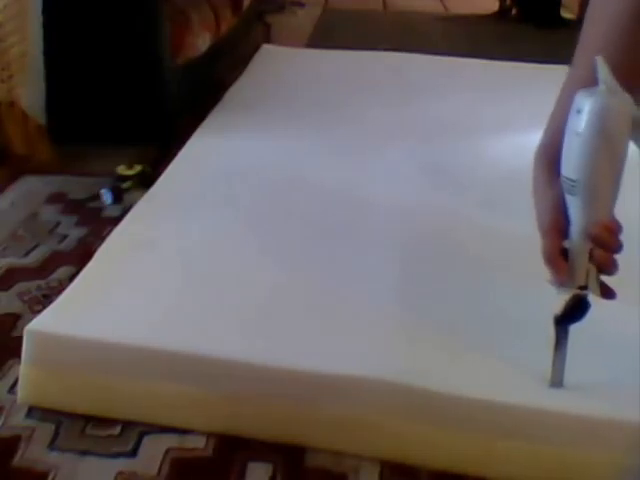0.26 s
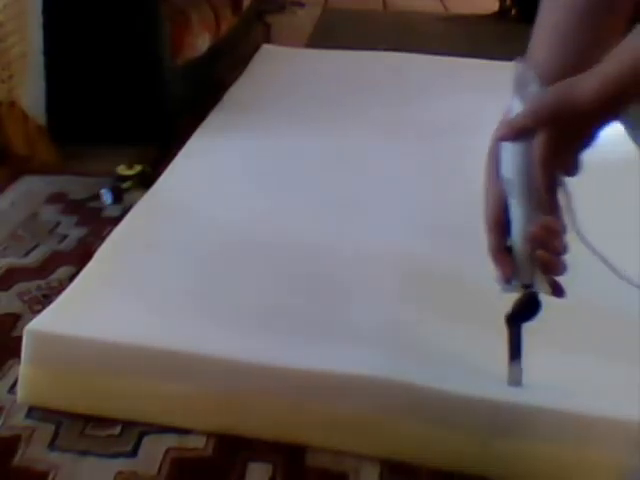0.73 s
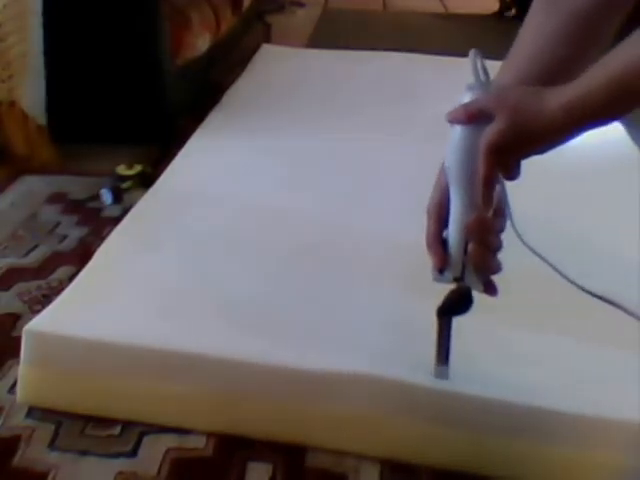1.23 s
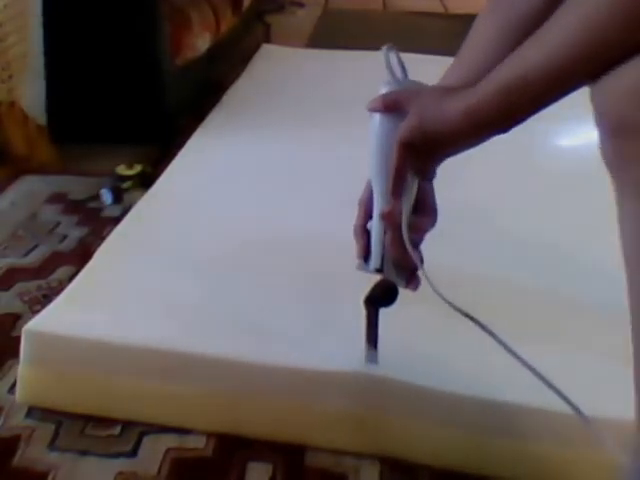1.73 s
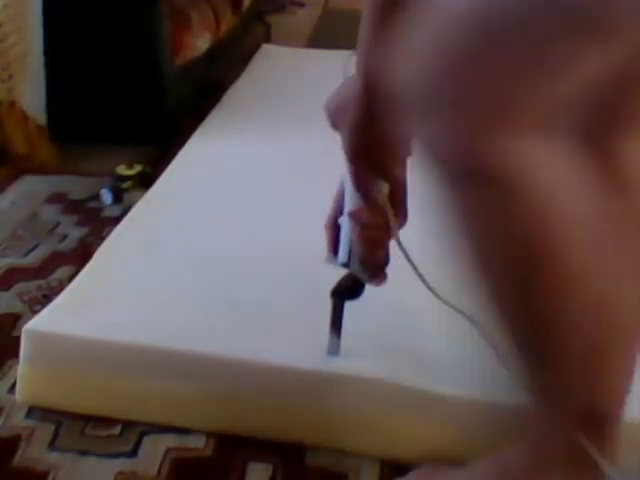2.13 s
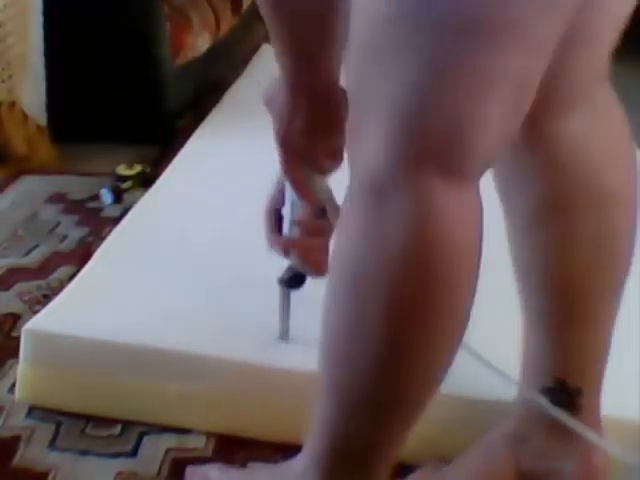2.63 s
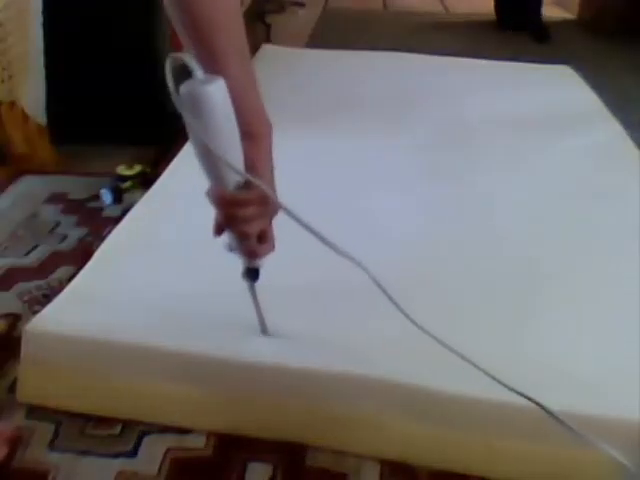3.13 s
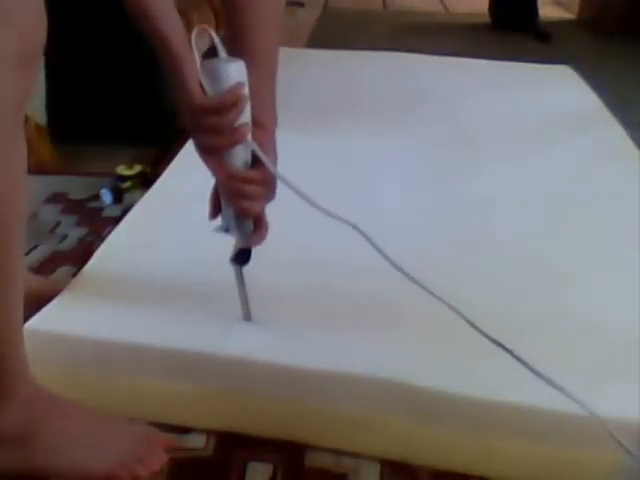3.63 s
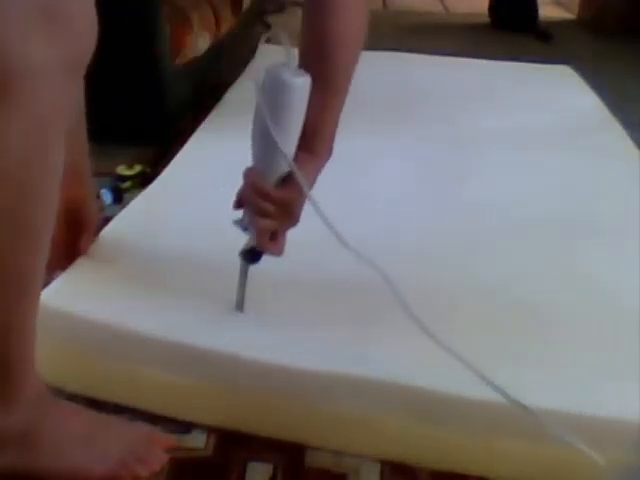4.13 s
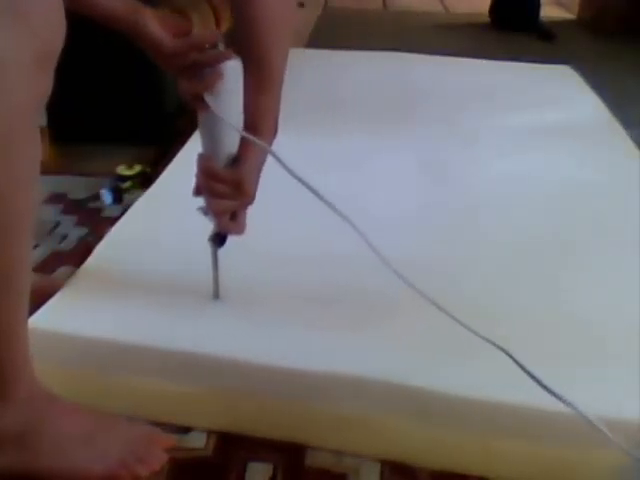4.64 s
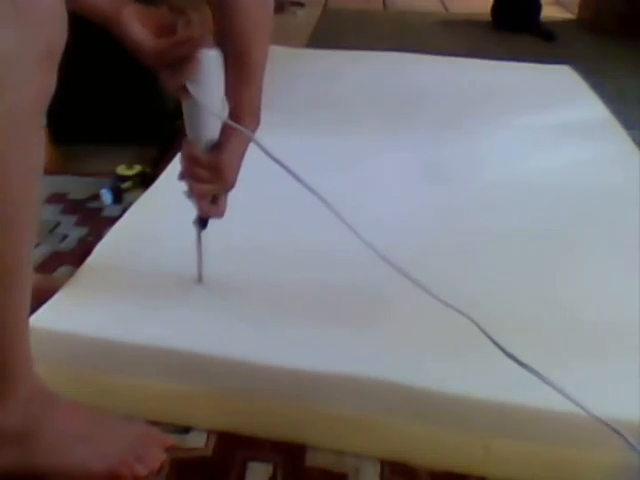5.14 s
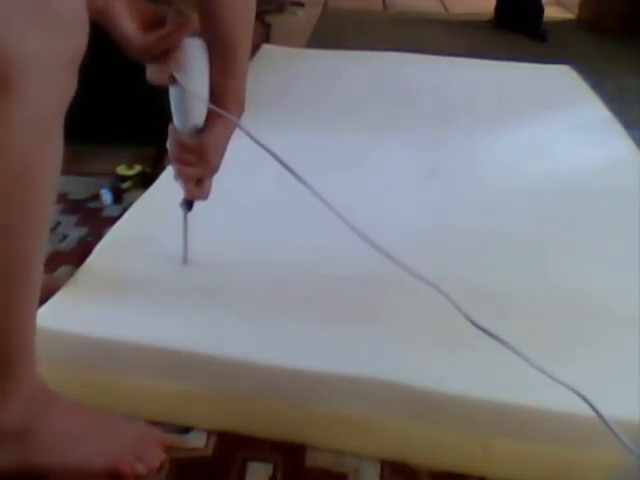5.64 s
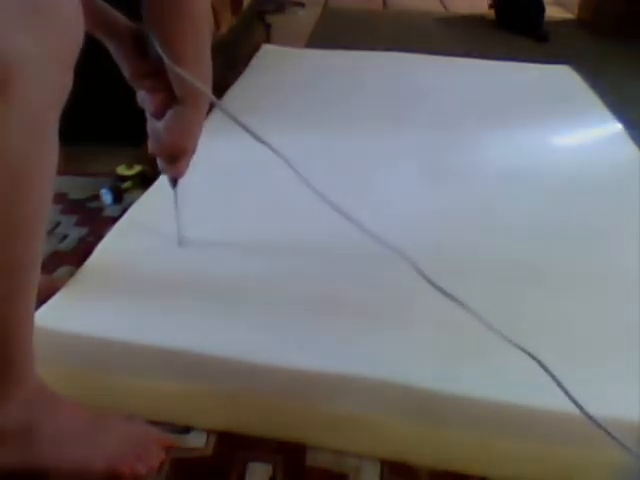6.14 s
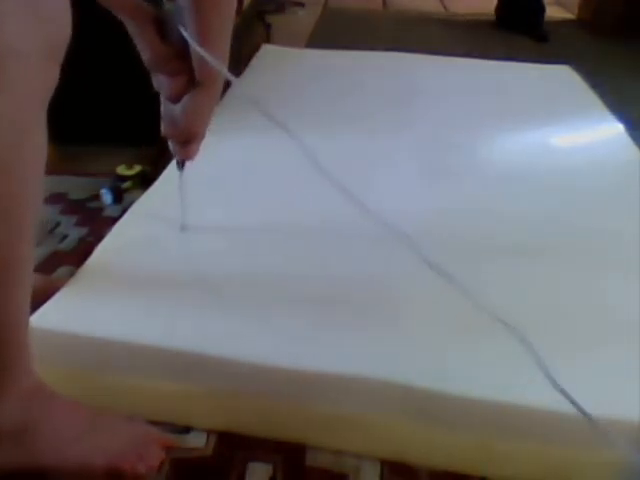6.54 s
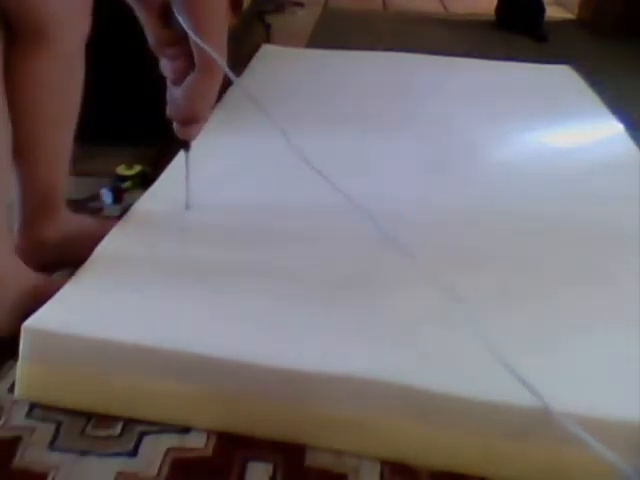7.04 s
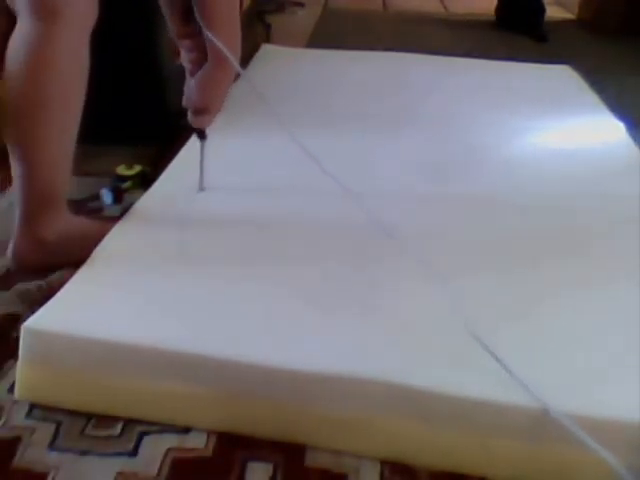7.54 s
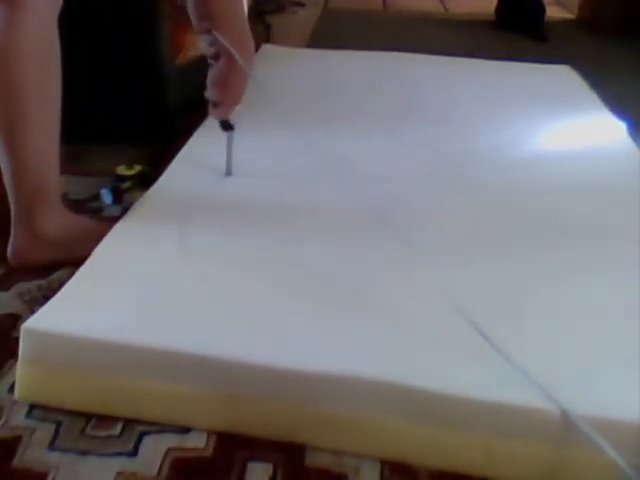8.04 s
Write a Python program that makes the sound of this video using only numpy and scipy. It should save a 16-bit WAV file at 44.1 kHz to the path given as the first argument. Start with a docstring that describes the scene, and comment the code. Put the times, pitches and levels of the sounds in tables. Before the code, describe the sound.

An electric carving knife cuts a foam mattress in a carpeted room, close to a stereo microphone. The motor stutters at first, then holds a high, wavering whine with a fizzing hiss, a blade rasp and a few thin squeals. The pitch sags, the sound drops out briefly and returns faster. Near the end it runs lighter and quieter with a slight rattle. A faint hum lies underneath.

```python
"""An electric carving knife saws a foam mattress in a carpeted room, close to a stereo microphone pair.
Over a steady hum, the brush motor stutters into the cut as the trigger slips. It whines on multiples of
the rotor speed, the brushes fizz twice a turn and the serrated blades rasp, with a few brief squeals.
The pitch sags as the blades bind; near 2.7 s the whole sound dips briefly, then the knife runs faster.
From about 6 s it runs light and quieter: the slack gear rattles and the mattress thrums for a moment."""
import sys
import numpy as np
from scipy import signal
from scipy.fft import rfft, irfft, next_fast_len
from scipy.io import wavfile
from scipy.ndimage import uniform_filter1d

SR = 44100
rng = np.random.default_rng(int(sys.argv[2]) if len(sys.argv) > 2 else 0)


def persist_wave(psi):
    """Save psi, clipped to +-1, as 16-bit WAV."""
    counts = np.round(np.clip(psi, -1, 1) * 32767).astype(np.int16)
    wavfile.write(sys.argv[1], SR, np.atleast_2d(counts).T)


N = 365148
TIME = np.arange(N) / SR


def undb(db):
    """Decibels to gain."""
    return 10 ** (np.asarray(db) / 20)


def unit(x):
    """Scale to rms 1."""
    return x / np.sqrt(np.mean(x ** 2))


def curves(rows):
    """Each column of a time table, joined by straight lines."""
    times, *columns = np.transpose(rows)
    return [np.interp(TIME, times, column) for column in columns]


def colour(x, points):
    """Filter by a spectrum of (Hz, dB) points."""
    hz, db = np.transpose(points)
    size = next_fast_len(N)
    bins = np.maximum(np.fft.rfftfreq(size, 1 / SR), 1)
    gain = undb(np.interp(np.log(bins), np.log(hz), db))
    return irfft(rfft(x, size) * gain, size)[:N]


def walk(rate):
    """Smooth random wander of rms 1, with rate changes a second."""
    step = max(int(SR / rate), 1)
    held = np.repeat(rng.standard_normal(N // step + 1), step)
    return unit(uniform_filter1d(uniform_filter1d(held, step), step)[:N])


def grains(spread_db):
    """Dense tiny clicks of scattered size."""
    return unit(rng.standard_normal(N) * undb(spread_db * rng.standard_normal(N)))


def ring(hz, width_hz):
    """A randomly driven resonance of rms 1; its centre may move."""
    pole = np.exp(-np.pi * width_hz / SR)
    drive = rng.standard_normal(N) + 1j * rng.standard_normal(N)
    envelope = signal.lfilter([1], [1, -2 * pole, pole ** 2], drive)
    carrier = np.exp(2j * np.pi * np.cumsum(hz * np.ones(N)) / SR)
    return unit(np.real(envelope * carrier))


# The hum behind the knife. Each row: time in seconds, level in dB.
HUM_LEVEL = [(0, -59), (.6, -55.5), (2.5, -54), (3.1, -57.5), (6.5, -57), (7.3, -59.5), (8.28, -57.5)]
def hum(swing_db, hz=480.4, follow=0.37):
    """A clean tone of fixed pitch; its level wavers and swells a little with the knife's."""
    db = curves(HUM_LEVEL)[0] + follow * swing_db + .8 * walk(14)
    return np.sqrt(2) * undb(db) * np.sin(2 * np.pi * hz * TIME)


# The room at the microphones. Each row: frequency in Hz, side against mid in dB.
ROOM_WIDTH = [(30, -13.5), (250, -12), (1000, -11.5), (2500, -15.5), (5000, -17.5), (9000, -15),
              (15000, -15.5)]
def room(x, t60=.5):
    """Diffuse reflections scramble the phase: the part that differs between left and right."""
    t = TIME[:16384]
    response = rfft(rng.standard_normal(len(t)) * np.exp(-np.log(1000) * t / t60))
    scrambler = np.roll(irfft(response / np.abs(response)), len(t) // 2)
    return colour(signal.fftconvolve(x, scrambler, mode="same"), ROOM_WIDTH)


# The foam shaking under the knife. Each row: start in seconds, length in seconds, level in dB.
MATTRESS_SHAKES = [(6.3, .87, -69.5)]
def thrum(stroke, fade_s=0.0499):
    """For a while each push and each pull shakes the mattress."""
    shake = sum(undb(db) * np.clip(np.minimum(TIME - start, start + length - TIME) / fade_s, 0, 1)
                for start, length, db in MATTRESS_SHAKES)
    return np.sqrt(2) * shake * undb(2 * walk(12)) * np.sin(2 * np.pi * 2 * stroke)


# The rush of cooling air. Each row: frequency in Hz, relative level in dB.
AIR_SPECTRUM = [(20, 0.5), (45, 0.5), (95, 0.5), (150, -.5), (300, -0.5), (700, 0), (1200, -0.26),
                (2300, -.3), (3500, -0.5), (5000, -4), (9000, -16.5), (16000, -30)]
def air(turns, depth=0.5, sharpness=1.3):
    """Broad rush from the motor housing, throbbing twice a turn."""
    throb = 1 + depth * np.exp(sharpness * (np.cos(2 * np.pi * 2 * turns) - 1))
    return unit(colour(grains(spread_db=3) * throb * undb(0.91 * walk(20)), AIR_SPECTRUM))


# The shell's resonances. Each row: centre in Hz, width in Hz, dB against the running noise.
SHELL_MODES = [(4060, 120, -31), (5910, 590, -27), (6600, 170, -22), (8770, 170, -30), (10000, 220, -21.5)]
def housing():
    """The plastic shell rings at a few fixed pitches, each wavering in level."""
    return sum(undb(db + 2 * walk(2.94)) * ring(hz, width) for hz, width, db in SHELL_MODES)


# A lone tick in the housing. Each row: start in seconds, relative level in dB.
SHELL_TICKS = [(1.936, -21)]
def ticks(decay_s=0.00029):
    """A very short dry crack."""
    out, t = np.zeros(N), TIME[:256]
    for start, db in SHELL_TICKS:
        at = int(start * SR)
        out[at:at + len(t)] += .5 * undb(db) * rng.standard_normal(len(t)) * np.exp(-t / decay_s)
    return out


# Blade on blade. Each row: centre in seconds, half length in seconds, pitch in Hz, level in dB.
BLADE_SQUEALS = [(.2, .035, 10100, -52), (.69, .025, 10100, -49), (2.17, .028, 10080, -48),
                 (2.14, .06, 11620, -54), (8.1, .2, 9980, -61)]
def squeals(waver=0.0031):
    """Steel rubs on steel for a moment and sings with an unsteady pitch."""
    clock = np.cumsum(1 + waver * walk(400)) / SR
    out = np.zeros(N)
    for centre, half, hz, db in BLADE_SQUEALS:
        swell = undb(db) * np.exp(-((TIME - centre) / half) ** 2)
        out += np.sqrt(2) * swell * np.sin(2 * np.pi * hz * clock)
    return out


# Foam tearing at the blades. Each row: frequency in Hz, relative level in dB.
RASP_SPECTRUM = [(3000, -45), (9300, -17), (10200, -9.5), (10900, -2), (11500, -6), (12200, 0), (13200, -9),
                 (14300, -13), (16000, -24)]
def blades(stroke, ring_hz, depth=0.19, ring_db=-3):
    """Serrations tear foam cells, hardest in mid stroke; the steel's pitch shifts with the cut's depth."""
    speed = 1 + depth * np.abs(np.sin(2 * np.pi * stroke))
    tearing = unit(colour(grains(spread_db=0.5), RASP_SPECTRUM))
    singing = ring(ring_hz * (1 + .006 * walk(15)), width_hz=620)
    return unit((tearing + undb(ring_db + 1.9 * walk(20)) * singing) * speed)


def sparks(turns, decay_turns=0.06):
    """One brush sparks once a turn: a steep rise to 1, then a slower fall."""
    age = (turns % 1) / decay_turns
    return age * np.exp(1 - age)


# The fizz of the brushes. Each row: frequency in Hz, relative level in dB.
FIZZ_SPECTRUM = [(1500, -35.5), (3500, -13), (5000, -5.5), (6000, -2.5), (6700, -2), (7400, -1.5),
                 (8700, -0.5), (9400, -0.5), (10200, 0.5), (11700, 2), (13500, 1), (14500, 2.5),
                 (15800, -3)]
def brushes(turns, stroke, first=0.87, second=0.75, scatter=0.23):
    """Two unequal brushes spit every turn, each time with a new strength."""
    strength = 1 + scatter * rng.uniform(-0.37, 1, (4096, 2))
    spit = first * strength[turns.astype(int), 0] * sparks(turns)
    spit += second * strength[(turns + .5).astype(int), 1] * sparks(turns + .5)
    load = (1 + 0.022 * np.sin(2 * np.pi * stroke)) * undb(0.33 * walk(30) + .5 * walk(300))
    return unit(colour(grains(spread_db=1) * (1 + spit) * load, FIZZ_SPECTRUM))


# The cut. Each row: time in seconds, blade rasp against brush fizz in dB, blade resonance in Hz.
BLADE_BITE = [(0, -11, 11700), (1.1, -11.5, 12100), (1.6, -12, 11810), (3.7, -8, 12330),
              (4.05, -6.5, 11500), (4.35, -3, 12040), (4.6, -2.5, 11550), (5.3, -9, 12200),
              (6.5, -15, 12800), (7.05, -21, 12300), (7.35, -4, 11650), (7.6, -16, 11900),
              (8.28, -6, 12450)]
def running_noise(turns, stroke, swing_db, rush_db=-11, steadiness=0.11):
    """Brushes and blades share the treble; the rush of air beneath swings less than they do."""
    rasp_db, ring_hz = curves(BLADE_BITE)
    rasp = undb(rasp_db)
    treble = brushes(turns, stroke) + rasp * blades(stroke, ring_hz)
    rush = undb(rush_db - steadiness * swing_db) * air(turns)
    return (treble + rush) / np.hypot(1, rasp)


# The trigger slips and the motor coasts. Each row: start in seconds, length in seconds.
TRIGGER_SLIPS = [(0, .025), (0.086, .028), (0.242, 0.031), (.584, .028), (1.936, .007), (2.034, .008),
                 (2.644, 0.2), (3.722, 0.035)]
def sag(recover_s=.039, coast_s=.027):
    """0 at full drive, about 1 deep in a slip: a straight slide while coasting, then an easing back."""
    out = np.zeros(N)
    for start, length in TRIGGER_SLIPS:
        slide = np.clip(np.minimum(TIME - start, length) / coast_s, 0, 1)
        out += slide * np.exp(-np.maximum(TIME - start - length, 0) / recover_s)
    return out


def power():
    """1 while the motor is driven, 0 while it coasts."""
    held = np.ones(N)
    for start, length in TRIGGER_SLIPS:
        held[(TIME > start) & (TIME < start + length)] = 0
    return uniform_filter1d(held, size=400)


# The rotor under load, trigger held. Each row: time in seconds, turns per second.
ROTOR_SPEED = [(0, 303), (.2, 300.5), (.48, 308.6), (.75, 303), (.9, 288.4), (1.23, 291.7), (1.38, 286.2),
               (1.8, 284.6), (1.96, 279.2), (2.11, 291.2), (2.33, 286), (2.52, 279), (3.0, 312),
               (3.16, 315), (3.3, 306), (3.39, 315.5), (3.68, 294), (3.95, 307.2), (4.28, 301.5),
               (4.58, 306.6), (5.27, 297.5), (5.72, 300.7), (5.85, 309), (5.97, 294), (6.44, 297.7),
               (7.0, 291.6), (8.28, 291.3)]
def rotor_turns(sag_hz=43.09):
    """Turns made so far; a slip costs speed, which comes back once the motor bites again."""
    speed_hz = curves(ROTOR_SPEED)[0] - sag_hz * sag()
    unsteadiness = 1 + 0.00079 * walk(30) + .0007 * walk(9)
    return np.cumsum(speed_hz * unsteadiness) / SR


# Gear slack, largest running light. Each row: time in seconds, swing of the 10th harmonic in radians.
GEAR_SLACK = [(0, 0.12), (2.6, 0.2), (3.05, 0.41), (3.6, .2), (5.9, .25), (6.5, .9), (7.6, 1.34),
              (8.2, 0.16)]
def rotor_angle(turns, stroke, jitter=0.24, rattle=0.5):
    """Slack in the gear rocks the rotor once a blade stroke."""
    slack, = curves(GEAR_SLACK)
    swing = slack * (np.sin(2 * np.pi * stroke) + rattle * walk(70)) + jitter * walk(250)
    return 2 * np.pi * turns + swing / 10


# The running noise at the microphones. Each row: time in seconds, relative level in dB.
KNIFE_LEVEL = [(0, -37.5), (.48, -34), (.85, -36.5), (2.03, -38.5), (2.3, -40.5), (2.52, -41.5),
               (2.88, -34.5), (3.5, -34), (3.75, -35.5), (4.4, -35), (5.0, -36.5), (5.88, -37),
               (5.94, -43.5), (6.3, -42), (6.9, -45), (7.25, -47), (7.7, -45), (8.28, -43)]
# Brief swells of the running level: mostly the blades catching in the foam; the first two rows, at 0.067 and
# 0.682 s, are the motor picking up again just after a trigger slip. Each row: centre in seconds, half length in
# seconds, boost in dB.
LEVEL_SURGES = [(0.067, 0.022, 3), (0.682, 0.016, -0.5), (2.09, .025, 4), (2.168, .028, 4),
                (2.619, .03, 2), (6.53, .1, 4.5), (6.983, 0.053, 3.5), (7.1, 0.058, 5), (7.449, 0.039, 4),
                (7.578, 0.02, 2.5)]
def running_level(drop_db=-4, inrush_db=2):
    """Level in dB: it drops at a slip, overshoots with the starting current, and swells briefly where the table
    says, mostly as the blades catch."""
    slip = sag(recover_s=0.029)
    slip_db = drop_db * slip + inrush_db * (sag(recover_s=0.097) - slip)
    surge_db = sum(db * np.exp(-((TIME - centre) / half) ** 2) for centre, half, db in LEVEL_SURGES)
    flicker_db = (0.29 + 0.72 * curves(GEAR_SLACK)[0]) * walk(45)
    return curves(KNIFE_LEVEL)[0] + slip_db + surge_db + flicker_db


# The motor's weaker tones. Each row: multiple of the rotor speed, level in dB.
SLOT_HARMONICS = [(4, -72), (7, -71.5), (8, -69.5), (9, -69), (12, -69), (19, -64), (21, -66), (22, -74),
                  (23, -67), (24, -66.5), (26, -66), (35, -68), (39, -73), (40, -70)]
def slots(angle, swing_db, follow=0.46, waver_db=2.0):
    """Uneven slots and segments give faint tones that come and go as the knife turns in the hand."""
    waver = undb(waver_db * walk(5))
    out = np.zeros(N)
    for order, db in SLOT_HARMONICS:
        tone = np.sin(order * angle + rng.uniform(0, 2 * np.pi))
        out += undb(db) * np.roll(waver, rng.integers(N)) * tone
    return np.sqrt(2) * out * undb(follow * swing_db)


# A thin 14th harmonic that fades slowly until about 6.6 s, then swells toward the end.
# Each row: time in seconds, level in dB.
THIN_OVERTONE = [(0, -65), (6.6, -76), (8.28, -63)]
# The main whine. Each row: time in seconds, then relative dB at 10, 20 and 30 times the rotor speed.
ARMATURE_LEVELS = [(0, -28, -14, -20), (.5, -18, -9, -19), (.76, -20.5, -18, -25), (1.0, -18.5, -15, -19),
                   (1.85, -17.5, -11.5, -24), (2.12, -17.5, -10.5, -14), (2.55, -20, -9, -26),
                   (3.05, -25, -16.5, -24), (3.4, -19.5, -14.5, -15), (3.68, -20.5, -19, -18),
                   (3.92, -15, -13, -23), (4.6, -15, -12, -21), (5.3, -22.5, -12.5, -26),
                   (5.58, -22.5, -28, -23), (5.86, -20, -14, -14), (6.05, -16.5, -28, -17),
                   (6.65, -20, -30, -24), (6.92, -19.5, -12, -27), (8.05, -21.5, -22, -29.5),
                   (8.28, -19, -14, -20)]
def whine(angle, flutter_db=1.47, waver_db=1.1, sag_db=-3.5, slack_db_per_rad=4):
    """Armature harmonics follow the running level and waver singly; the lowest grows with gear slack."""
    low_db, middle_db, high_db = curves(ARMATURE_LEVELS)
    low_db += slack_db_per_rad * curves(GEAR_SLACK)[0]
    strong = sum(undb(db + waver_db * walk(9)) * np.sin(order * angle)
                 for order, db in ((10, low_db), (20, middle_db), (30, high_db)))
    level_db = curves(KNIFE_LEVEL)[0] - .5 + sag_db * sag() + flutter_db * walk(40)
    thin = undb(curves(THIN_OVERTONE)[0]) * np.sin(14 * angle)
    return np.sqrt(2) * (undb(level_db) * strong + thin)


def dip(from_s=2.656, to_s=2.841, fall_db_per_s=520, rise_db_per_s=2150, floor_db=-76.5):
    """The level slides away briefly and snaps back, in dB."""
    falling = fall_db_per_s * (from_s - TIME)
    rising = rise_db_per_s * (TIME - to_s)
    return np.clip(np.maximum(falling, rising), floor_db, 0)


def scene():
    """The knife in front of the microphones, the carpeted room around it, the hum underneath."""
    turns = rotor_turns()
    stroke = turns / 6  # a worm gear gives one blade stroke in six turns
    angle = rotor_angle(turns, stroke)
    run_db = running_level()
    swing_db = run_db - run_db.mean()
    effort = undb(run_db + 0.58)
    noise = running_noise(turns, stroke, swing_db)
    tones = power() * (whine(angle) + slots(angle, swing_db))
    knife = effort * (noise + housing()) + tones + thrum(stroke) + squeals() + ticks()
    # the stereo spread follows the knife's level at once
    side = effort * room(knife / effort) * np.array([[1], [-1]])
    dip_db = dip()
    # the hum sinks less than the knife during the dip
    return (knife + side) * undb(dip_db) + hum(swing_db) * undb(0.62 * dip_db)


def record(dry, top_hz=15900, balance_db=0.1):
    """A nearly centred microphone pair with a steep top edge."""
    lowpass = signal.firwin(801, top_hz, fs=SR, window=("kaiser", 8))
    balance = undb([[balance_db], [-balance_db]])
    return signal.fftconvolve(dry, lowpass[None], mode="same", axes=1) * balance


dry = scene()
out = record(dry)
persist_wave(out)
```